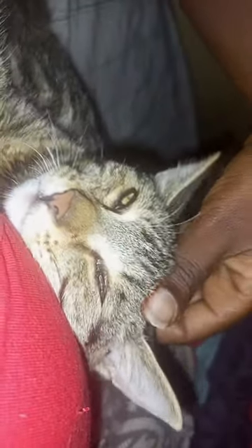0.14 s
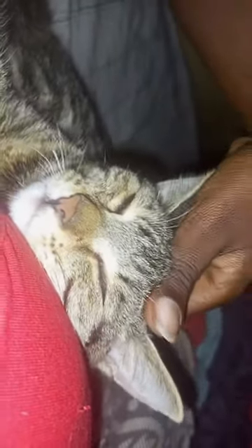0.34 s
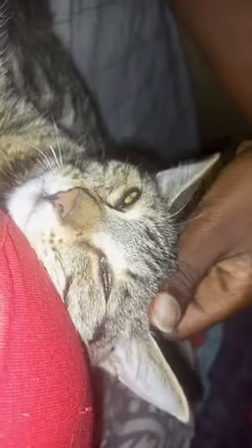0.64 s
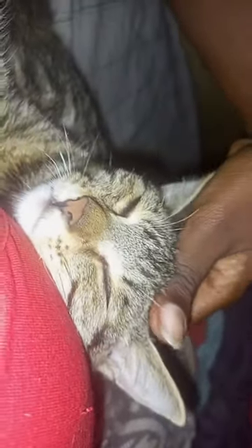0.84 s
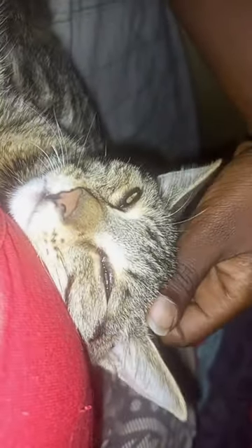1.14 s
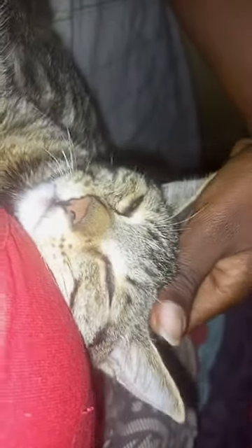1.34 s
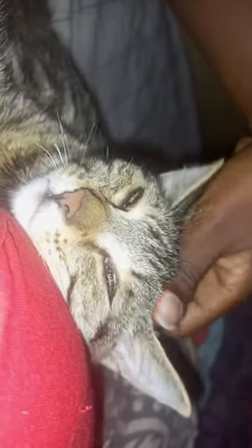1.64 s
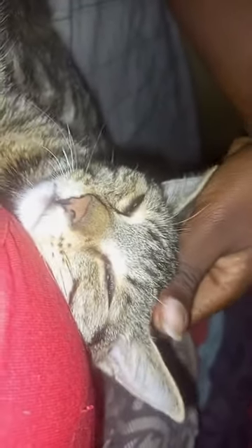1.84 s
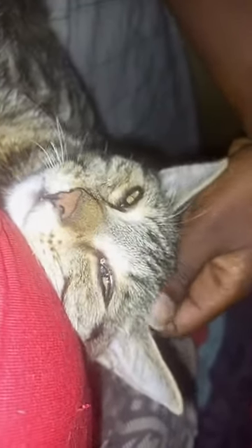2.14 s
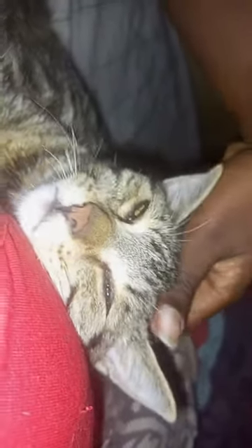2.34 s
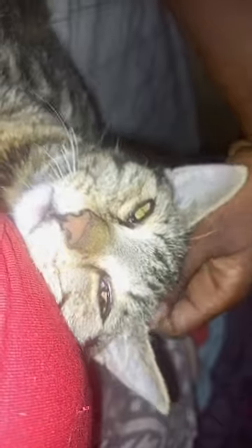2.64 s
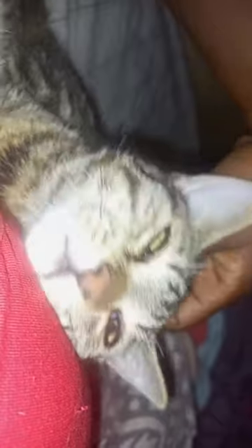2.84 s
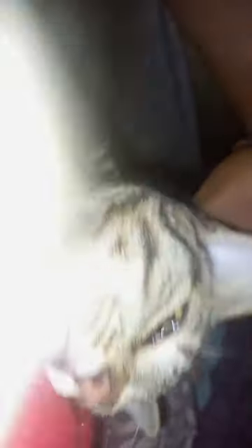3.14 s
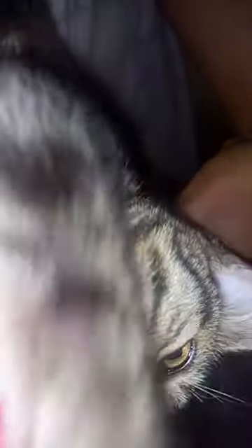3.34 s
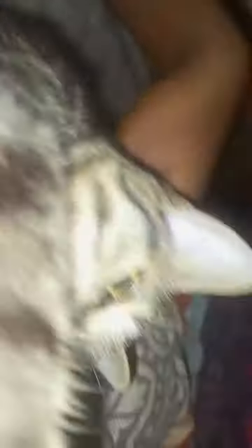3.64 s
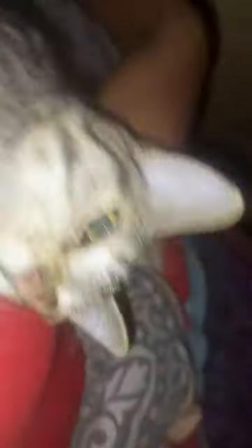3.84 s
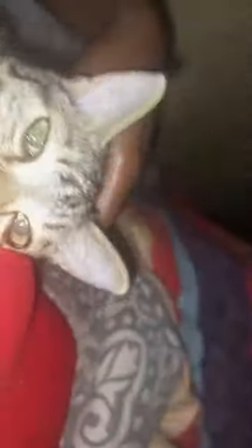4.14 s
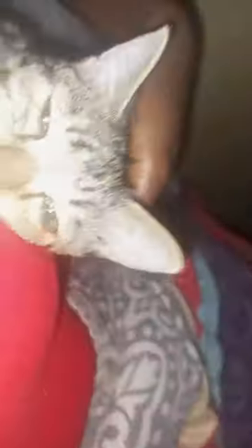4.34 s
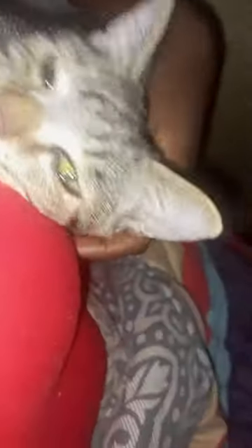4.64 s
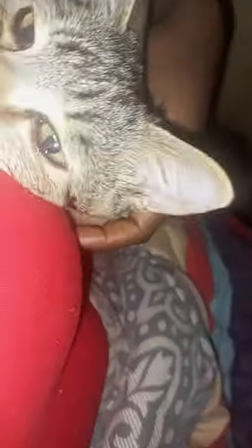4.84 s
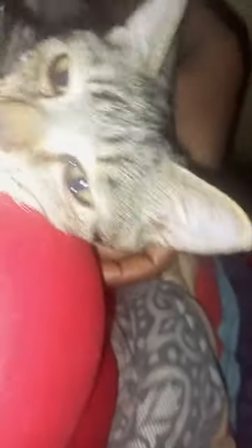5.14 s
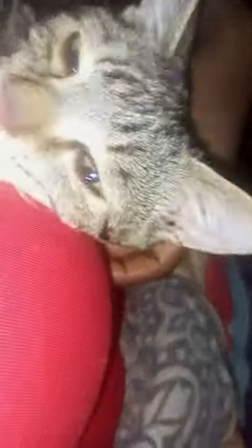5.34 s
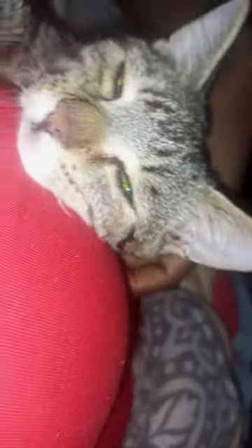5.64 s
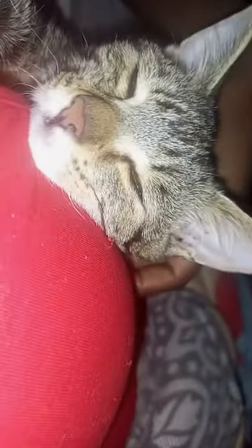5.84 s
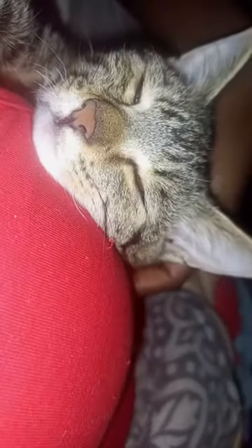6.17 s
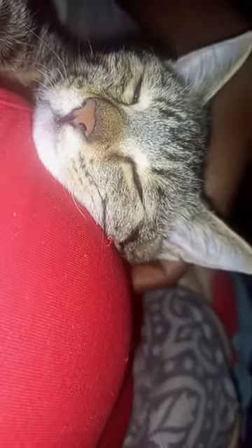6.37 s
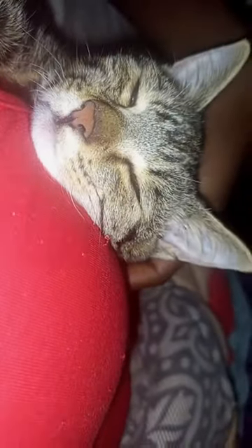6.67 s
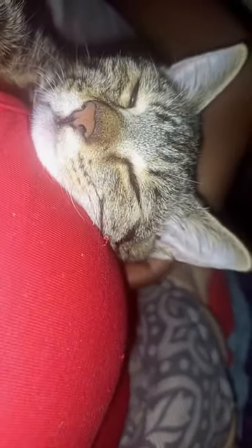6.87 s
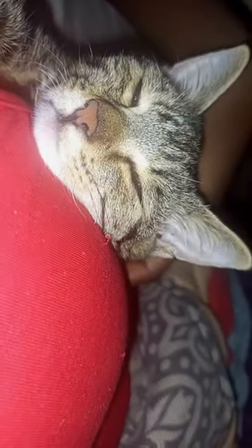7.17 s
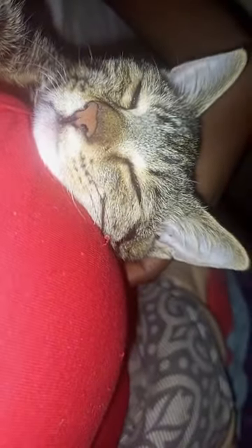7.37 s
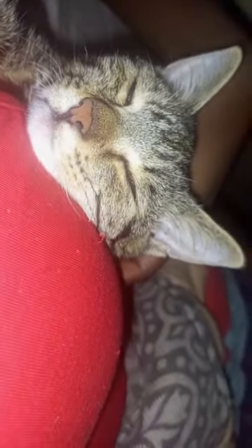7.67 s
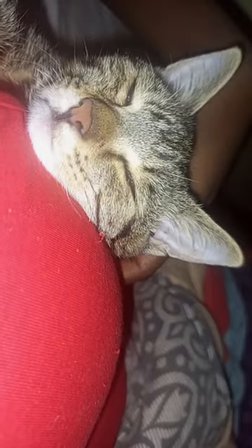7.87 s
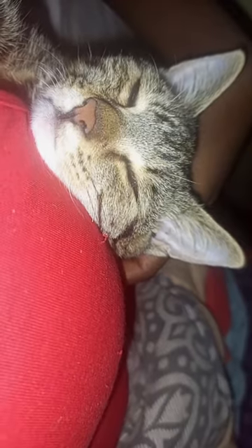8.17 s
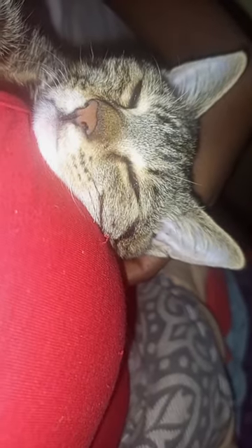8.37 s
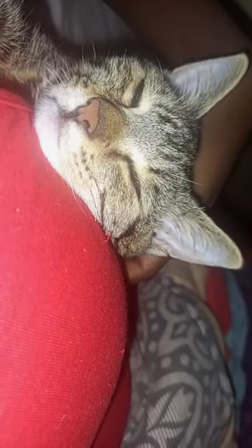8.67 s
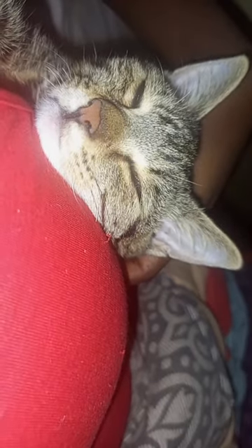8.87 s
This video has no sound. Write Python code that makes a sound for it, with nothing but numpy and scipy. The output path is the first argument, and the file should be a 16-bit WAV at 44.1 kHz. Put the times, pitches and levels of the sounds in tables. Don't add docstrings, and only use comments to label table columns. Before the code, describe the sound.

Very close, dry sound of a dozing kitten in a quiet soft-furnished room. The purr never stops, alternating between slightly firmer, quicker in-breaths and softer out-breaths, each around half a second or shorter. After a brief sniff, the purr carries on until fingers shift on the microphone's hard case, giving a bright crackling clatter much louder than the purr. It settles into occasional small clicks, while purring, low bedding groans and soft hiss continue.

```python
import sys
import numpy as np
from scipy import signal
from scipy.fft import rfft, irfft, next_fast_len
from scipy.io import wavfile
from scipy.ndimage import uniform_filter1d, map_coordinates

SR = 44100
rng = np.random.default_rng(int(sys.argv[2]) if len(sys.argv) > 2 else 0)


def transcribe(signal):
    frames = np.atleast_2d(signal).T
    limited = np.clip(frames, -1, 1)
    pcm = np.round(limited * 32767).astype(np.int16)
    wavfile.write(sys.argv[1], SR, pcm)


def magnitude_from_level(level_db):
    exponent = np.asarray(level_db, float) / 20
    return 10 ** exponent


N = 397341


def unit(x):
    return x / np.sqrt(np.mean(x ** 2) + 1e-20)


def curves(rows, t):
    s, *cols = np.transpose(rows)
    return [np.interp(t, s, c) for c in cols]


def filtered(x, response):
    m = next_fast_len(N + SR // 2)
    return irfft(rfft(x, m) * response(np.fft.rfftfreq(m, 1 / SR)), m)[:N]


def colour(points):
    hz, db = np.transpose(points)
    return lambda f: magnitude_from_level(np.interp(np.log(f + 1), np.log(hz + 1), db, left=-120, right=-120))


def peak(f, hz, width_hz):
    return 1j * f * width_hz / (hz * hz - f * f + 1j * f * width_hz)


def lowpass(f, edge_hz, order):
    return 1 / (1 + (f / edge_hz) ** order)


def noise(response):
    return unit(filtered(rng.standard_normal(N), response))


def wobble(rate):
    return map_coordinates(rng.standard_normal(int(N * rate / SR) + 4), [np.arange(N) * rate / SR])


def swell(t, centre, half):
    return np.exp(-((t - centre) / half) ** 2)


def train(times, sizes):
    at = np.clip(np.round(times * SR).astype(int), 0, N - 1)
    return np.bincount(at, sizes, N)


def patchy(x, depth_db):
    z = signal.stft(x, nperseg=512)[2]
    field = uniform_filter1d(rng.standard_normal(z.shape), size=9, axis=0)
    field = uniform_filter1d(field, size=16, axis=1)
    return signal.istft(z * magnitude_from_level(depth_db * unit(field)), nperseg=512)[1][:N]


def facing(t):
    return swell(t, 3.9, .8)


# (frequency [Hz], level [dB])
HISS_COLOUR = [(590, -45), (1000, -4), (1190, -11), (1510, -12), (5810, -16), (7970, -23), (13200, -25),
               (14800, -18), (15500, -20.5), (15700, -80)]
HISS_DB, RUSTLE_DB, STIR_DB = -71.5, 1.2, .8


def room():
    t = np.arange(N) / SR
    murk = noise(lambda f: peak(f, 200, 260) * (1 + 0.5 * peak(f, 850, 370)) * lowpass(f, 1000, 6))
    murk = magnitude_from_level(-70 + 2 * wobble(6)) * murk
    hiss_db = HISS_DB + .4 * wobble(3) + STIR_DB * facing(t)
    return murk + magnitude_from_level(hiss_db) * patchy(noise(colour(HISS_COLOUR)), RUSTLE_DB)


def bedding(x):
    t = np.arange(SR // 20) / SR
    pieces = np.pad(x, (0, -N % 8192)).reshape(-1, 8192)
    tails = rng.standard_normal((len(pieces), len(t))) * magnitude_from_level(-60 * t / .045) * np.clip(t / .005, 0, 1)
    wet = signal.fftconvolve(pieces, tails / np.linalg.norm(tails[0]), axes=1)
    spill = np.pad(wet[:-1, 8192:], ((1, 0), (0, 8193 - len(t))))
    return (wet[:, :8192] + spill).ravel()[:N]


# (time [s], peak
# level [dB], ring [Hz])
CRACKS = [(4.7559, -29, 4930), (4.763, -37.5, 5900), (4.794, -24, 5100), (4.8076, -32.5, 6090),
          (4.8163, -30.5, 4350), (4.8224, -17.5, 7450), (4.828, -18.5, 5300), (4.843, -31, 6030),
          (4.848, -30, 6130), (4.855, -29.5, 6200), (4.863, -20, 4330), (4.8676, -21.5, 6170),
          (4.8783, -26.5, 9860), (4.883, -24, 5470), (4.8892, 0.5, 3780), (4.9032, -24.5, 5493),
          (4.921, -16, 6934), (4.927, -29.5, 4030), (4.9392, -11.5, 2280), (4.947, -20.5, 4140),
          (4.959, -31, 6100), (4.963, -27.5, 6760), (4.973, -23.5, 4050), (4.979, -26, 4720),
          (4.9994, -27.5, 5880), (5.0047, -23, 4600), (5.059, -16, 5667), (5.0615, -37.5, 9700),
          (3.349, -43.5, 1494), (4.8606, -19, 5310), (4.909, -46, 7924), (5.045, -38, 9500),
               (4.785, -49, 9000), (4.832, -32, 8000), (4.8365, -34, 8980), (4.8445, -35, 8950),
               (4.925, -30, 8500), (4.968, -37, 3000), (4.989, -36, 10000), (5.049, -38, 6000),
               (5.04, -40, 2500), (4.8578, -22.5, 8020), (5.245, -52.5, 11520), (5.281, -51, 4100),
               (5.2545, -55, 9000), (5.318, -50, 9500), (5.333, -52.5, 6010), (5.396, -52, 3990),
               (5.4655, -51.5, 7960), (5.188, -53, 3200), (6.2346, -48, 4500), (6.587, -56, 9000),
               (6.598, -55.5, 6000), (6.621, -56, 6200), (8.333, -57, 6000), (8.339, -56, 5000),
               (7.6535, -41.5, 7500), (7.655, -44, 12000), (1.104, -57, 9300), (5.2123, -48, 13000),
               (5.293, -53, 10000), (6.568, -56, 4500), (6.631, -55, 5514), (7.576, -47.5, 4504),
               (7.594, -46, 4040), (7.646, -50.5, 6000), (7.6592, -50.5, 1990), (7.795, -57, 7490)]
# (time [s], peak level [dB], ring [Hz])
KNOCKS = [(4.8643, -28, 1141), (4.9164, -29, 1165), (4.9277, -26.5, 1192), (4.98, -32, 1304),
          (5.005, -32, 910.3), (4.899, -42, 900), (4.998, -40, 880), (4.6, -49, 510), (4.907, -44.5, 303.7),
          (4.864, -42, 480), (4.794, -46, 200), (4.949, -40, 230), (4.997, -36, 1600), (4.899, -40, 1400),
          (4.448, -45.5, 187), (5.4, -52, 110), (5.009, -42.5, 350), (5.024, -44, 350)]
# (time [s], peak level [dB], ring [Hz], ring length [swings])
SETTLING = [(0.8305, -47, 5000, 1.6), (0.94, -53, 3400, 2.8), (.94, -56, 8000, 3), (3.3485, -49.5, 6560, 3),
            (5.0719, -43, 10600, 1.1), (5.083, -48, 5050, 1.25), (5.1154, -38.5, 10200, 2.6),
            (5.1363, -38.5, 7120, 3.7), (5.1477, -40.5, 3850, 3.9), (5.1668, -27.5, 4250, 1.44),
            (5.1736, -36, 4422, 0.74), (5.2123, -44.5, 9500, 4.4), (5.2329, -40.5, 4230, 1.6),
            (5.2631, -47, 5055, 2.4), (5.293, -41.5, 4030, 1), (5.2993, -39.5, 6350, 0.69),
            (5.3522, -44.5, 3870, 1.24), (5.3654, -40, 7300, 3.7), (6.1543, -41, 7000, 9.8),
            (6.234, -42, 9765, 2.4), (6.5805, -47.5, 9800, 3.5), (6.579, -53, 2300, 1.2),
            (6.5929, -41, 3806, 1.3), (7.1382, -23, 6620, 1.96), (7.1385, -42.5, 1900, 1.5),
            (4.889, -47, 110, 0.88), (6.1545, -48.5, 5150, 6), (6.1545, -57, 4300, 6),
            (6.155, -60, 2600, 3.8), (7.661, -55, 2050, 7), (5.083, -52, 8000, 2), (5.1405, -48, 7000, 2),
            (5.0625, -40, 13000, 3), (6.163, -54, 7000, 9), (6.163, -59, 5200, 7), (6.249, -60, 3100, 5),
            (6.537, -60, 7250, 13.4), (8.3515, -53, 5800, 4), (8.308, -54, 4300, 2.5),
            (8.737, -56, 4200, 3), (7.66, -51.5, 2100, 2.6), (8.737, -55, 3480, 2.1),
            (7.142, -33, 5970, 0.53), (7.2954, -47, 6500, 0.98), (7.6007, -47, 3940, 2.5),
            (7.6504, -34.5, 4370, 0.44), (7.6579, -28, 9030, 1.7), (8.3512, -45, 7500, 1.5),
            (8.7365, -41.5, 4370, 0.94)]


def contacts():
    u = np.arange(-400, 400) / SR
    ticks, edges = np.zeros(N + SR), np.zeros(N + SR)
    hits = [(s, db, hz, 0.44 + hz * 0.00014) for s, db, hz in CRACKS]
    hits += [(*knock, 2.0) for knock in KNOCKS] + SETTLING
    for (s, db, hz, swings), grit in zip(hits, rng.standard_normal((len(hits), len(u)))):
        ring = -1.2 * np.exp(-(u * hz / (.5 * swings)) ** 2) * np.sin(2 * np.pi * hz * u)
        blur = uniform_filter1d(grit[::-1], size=12) * np.cos(2 * np.pi * hz * u)
        halo = 0.21 * np.exp(-np.abs(u) / 0.0021) * blur
        edge = .3 * np.exp(-np.abs(u) / .0001) * grit
        rattle = 0.04 * np.exp(-np.abs(u) / 0.0012) * grit[::-1]
        sharpness = np.clip((db + 52) / 28, .25, 1) * (hz > 1500) * (.5 if s > GRIP[-1][0] else 1)
        first = round(s * SR) - 400
        ticks[first:][:len(u)] += magnitude_from_level(db) * (ring + halo)
        edges[first:][:len(u)] += magnitude_from_level(db) * sharpness * (edge + rattle)
    return ticks[:N], edges[:N]


# (time [s], creak level [dB], low scrape level [dB])
GRIP = [(4.72, -76, -59), (4.76, -65, -62), (4.8, -60, -60), (4.82, -50, -55), (4.84, -50, -58),
        (4.865, -46, -49), (4.895, -52, -47), (4.93, -52.5, -40), (4.955, -54, -42), (4.975, -51, -50),
        (4.99, -56, -49), (5.01, -51, -51), (5.03, -58, -56), (5.055, -58, -70), (5.07, -63.5, -77),
        (5.1, -68.5, -77.5), (5.42, -81, -87)]
# (frequency [Hz], level [dB])
CASE_COLOUR = [(590, -30), (1000, -12), (1240, -9), (2190, -10.5), (4130, -9.5), (4540, -8), (7010, -11),
               (13400, -24), (15200, -25), (16500, -32.5)]
# (centre time [s], half length [s], level [dB])
BRUSHES = [
    (5.164, 0.012, -67),
    (6.588, 0.029, -65),
    (7.595, 0.034, -81),
    (7.657, 0.0049, -62),
]


def grip():
    t = np.arange(N) / SR
    case = colour(CASE_COLOUR)
    creak_db, low_db = curves(GRIP, t)
    held = (t > GRIP[0][0]) & (t < GRIP[-1][0])
    slips = rng.random(N) < 900 / SR
    snaps = slips * rng.standard_normal(N) * magnitude_from_level(7 * np.minimum(rng.exponential(size=N), .8))
    spray = unit(snaps) + .8 * rng.standard_normal(N)
    spray = unit(filtered(spray, lambda f: case(f) * lowpass(f, 11000, 2)))
    scrape = magnitude_from_level(2.7 * wobble(70)) * patchy(noise(lambda f: peak(f, 330, 420) ** 2), 3)
    ticks, edges = contacts()
    shell = filtered(edges, lambda f: case(f) * (1 + 1.3 * swell(f, 11500, 3500)))
    close = held * (magnitude_from_level(creak_db + 3 * wobble(60)) * spray + magnitude_from_level(low_db - 4) * scrape)
    close += ticks + magnitude_from_level(10) * shell
    lone = ticks * (np.abs(t - 4.9) > .17)
    close += magnitude_from_level(-22) * filtered(bedding(lone), lambda f: lowpass(f, 8000, 4))
    close += spray * sum(magnitude_from_level(db) * swell(t, s, half) for s, half, db in BRUSHES)
    return filtered(close, lambda f: 1 + 5 * peak(f, 15300, 1200))


# (start time [s], parting snap level [dB], shutting snap against it [dB], body rumble level [dB],
# effort peak [share of the breath])
BREATHS_IN = [(0.1342, -38, -2.5, -61, 0.26), (0.693, -39, -4, -56.5, 0.38),
              (1.256, -40, -1.5, -56.5, 0.71), (1.8975, -40, -4, -56.5, 0.51),
              (2.5015, -41, -7, -56.5, 0.54), (3.5283, -38.5, -4, -52.5, 0.48),
              (4.0903, -40.5, -2, -61, 0.65), (4.5771, -41, -5.5, -59, 0.21),
              (5.169, -44, -5.5, -62.5, -0.27), (5.6212, -43.5, -1.5, -58.5, 0.39),
              (6.1502, -44.5, 0, -57, 0.12), (6.568, -42.5, -4.5, -58, 0.45),
              (7.0954, -40.5, -7.5, -61, 0.55), (7.7415, -43, -1.5, -60, .4),
              (8.3456, -41, -0.5, -59.5, 0.41)]
# (start time [s], parting snap level [dB], shutting snap against it [dB],
# body rumble level [dB], effort peak [share of the breath])
BREATHS_OUT = [(-0.174, -42, -6, -61, 0.32), (0.383, -42.5, -3, -58, 0.19),
               (0.9448, -42, -2.5, -55.5, 0.25), (1.5467, -43.5, -0.5, -60.5, 0.56),
               (2.1885, -44, -1, -61.5, -0.0062), (3.0532, -41.5, -2.5, -65.5, 0.098),
               (3.817, -44.5, -1.5, -59.5, 0.53), (4.3042, -43.5, -0.5, -57.5, 0.24),
               (4.829, -49.5, -6, -70, 0.29), (5.134, -44, -7, -69, -0.14), (5.3484, -46.5, -5, -62, 0.26),
               (5.8378, -45, -3.5, -59, 0.22), (6.329, -44.5, -3, -61, .4),
               (6.8202, -44.5, -5.5, -60, 0.25), (7.3892, -44, -7, -61.5, 0.12),
               (7.9935, -43, -7, -63, 0.17), (8.601, -44.5, -4.5, -63, 0.12)]
# (centre time [s], half length [s], lag [ms])
STUMBLES = [(.172, .03, -2), (.61, .06, -2), (.745, .04, -2.7), (1.04, .06, 1.2), (1.16, .05, -1),
            (1.73, .12, -2.2), (1.97, .05, -1.6), (2.25, .04, 2.2), (2.42, .06, -2.2), (2.72, .1, 1),
            (2.98, .07, -2.2), (3.19, .1, 2.6), (3.44, .05, -1), (4.4, .04, -1), (5.22, .04, -1.8),
            (5.41, .055, 2.2), (5.68, .04, -1), (5.99, .09, 1), (6.22, .05, -2), (6.38, .05, 1.8),
            (6.73, .05, 1), (6.99, .07, -2.2), (7.16, .05, -1.8), (7.53, .07, 1.6), (7.82, .04, -1),
            (8.4, .04, -2.2), (8.7, .07, 2.2)]
END_S = 8.9903
PACE_IN = dict(cycle=.0362, drag=.0015, bow=.0008, rise_db=10, fall_db=8, tilt_db=-2.5)
PACE_OUT = dict(cycle=.039, drag=-.0018, bow=.0004, rise_db=5, fall_db=6.5, tilt_db=-1)


def cycles():
    breaths = sorted([(*b, False) for b in BREATHS_IN] + [(*b, True) for b in BREATHS_OUT])
    ends = [b[0] for b in breaths[1:]] + [END_S]
    rows = []
    for (start, part_db, shut_db, rumble_db, top, out), end in zip(breaths, ends):
        pace = PACE_OUT if out else PACE_IN
        count = round((end - start) / pace["cycle"])
        u = np.arange(count) / count
        rising = pace["rise_db"] * (1 - u / top) ** 2
        falling = pace["fall_db"] * ((u - top) / (1 - top)) ** 2
        slack_db = np.where(u < top, rising, falling)
        s = start + u * (end - start) + pace["bow"] * np.sin(np.pi * u)
        s = s + pace["drag"] * np.sin(2 * np.pi * u ** .7)
        last_db = 2.5 * (u == u[-1])
        rows.append([s, out & (u > 0), part_db - slack_db - last_db,
                     shut_db + pace["tilt_db"] * (2 * u - 1), rumble_db - 0.4 * slack_db])
    s, *air = np.hstack(rows)
    s = s + sum(lag / 1000 * swell(s, at, half) for at, half, lag in STUMBLES)
    return np.vstack([s, np.roll(air, 1, axis=1)])


def turning(t):
    parts = cycles()[0]
    return 2 * np.pi * np.interp(t, np.append(parts, END_S), np.arange(len(parts) + 1))


# (centre time [s], half length [s], level [dB], pitch [Hz])
WHISTLES = [(0.246, 0.093, -85, 1670), (0.475, .04, -75, 1870), (0.714, 0.04, -72, 1310),
            (0.82, .05, -72, 1606), (1.033, 0.02, -73, 1720), (1.275, 0.018, -66, 2480),
            (1.446, 0.1, -72.5, 1690), (1.71, 0.037, -73.5, 1680), (2.058, 0.066, -75, 1686),
            (2.867, 0.012, -67.5, 1790), (3.029, 0.072, -71.5, 1286), (3.08, 0.019, -69, 2167),
            (3.236, 0.12, -68.5, 2390), (3.22, 0.085, -70, 1850), (3.73, 0.047, -72, 1390),
            (3.75, 0.09, -78, 5600), (3.945, 0.02, -75, 1900), (4.234, 0.05, -77, 5300),
            (4.286, 0.045, -79, 2200), (4.467, 0.08, -79, 1796), (3.153, 0.02, -78, 3880),
            (3.2, .01, -79, 3950), (3.237, .012, -78, 3750), (5.45, .1, -77, 1500), (5.72, .12, -77, 1400),
            (4.67, .06, -75, 1300), (3.5, .1, -77, 1250), (6.7, .08, -77, 1300), (4.1, .1, -78, 2600),
            (3.135, .008, -70, 2210), (3.16, .01, -68, 2000), (3.2, .07, -73, 1417),
            (2.414, .012, -68, 1900), (8.204, 0.16, -77.5, 1238)]


def whistles():
    t = np.arange(N) / SR
    turn = turning(t)
    puffs = 0.22 + 0.7 * np.exp(6 * (np.cos(turn) - 1)) + 0.6 * np.exp(4 * (np.cos(turn + 2.1) - 1))
    flutter = np.tanh(1.5 * noise(lambda f: lowpass(f, 170, 2)))
    air = np.zeros(N)
    for (s, half, db, hz), shift in zip(WHISTLES, rng.integers(N, size=len(WHISTLES))):
        near = slice(round((s - 2 * half) * SR), round((s + 2 * half) * SR))
        tone = np.sin(2 * np.pi * hz * t[near]) * np.roll(flutter, shift)[near]
        air[near] += magnitude_from_level(db) * swell(t[near], s, half) * tone
    return magnitude_from_level(11.0 + wobble(25)) * puffs * air


# (start time [s], length [s], level [dB])
SNIFF = (2.3865, 0.028, -38.5)
# (frequency [Hz], level [dB])
SNIFF_COLOUR = [(120, -38), (200, -12), (620, -6), (900, -22), (1070, -9), (1500, -6), (1800, -2),
                (2320, 1), (2750, -20), (3150, -34), (3750, -40), (4400, -21), (4850, -26), (5200, -42),
                (9000, -46), (11700, -79), (19800, -120)]


def sniff():
    t = np.arange(N) / SR
    start, length, db = SNIFF
    gate = np.clip(np.minimum(t - start, start + length - t) / 0.0027, 0, 1)
    gate = gate * (0.64 + 0.56 * swell(t, start + 0.41 * length, 0.0073))
    return magnitude_from_level(2.4 * wobble(160) + db) * gate * noise(colour(SNIFF_COLOUR))


# (centre time [s], half length [s], level [dB])
HUMS = [(0.0, 0.026, -58.5), (0.33, 0.13, -56), (0.553, 0.071, -62), (0.833, 0.074, -56.5),
        (1.09, 0.056, -56.5), (1.257, 0.074, -60), (1.47, 0.1, -63), (1.76, 0.066, -61),
        (2.095, 0.078, -55.5), (2.34, 0.077, -60), (2.725, 0.088, -62), (2.888, 0.046, -56.5),
        (3.213, 0.13, -82), (3.762, 0.043, -59), (4.68, 0.22, -67), (5.419, 0.08, -64.5),
        (6.18, 0.061, -55.5), (6.47, 0.04, -64), (6.56, 0.027, -62.5), (7, 0.1, -61), (7.174, 0.067, -58.5),
        (7.395, 0.047, -52.5), (7.593, 0.05, -52), (7.9, 0.097, -63.5), (8.217, 0.048, -60.5),
        (8.595, 0.12, -59.5)]
# (centre time [s], half length [s], level [dB], pitch [Hz])
GROANS = [
    (3, 0.038, -59, 130),
    (6.35, 0.047, -49, 158),
    (6.43, 0.04, -50.5, 175),
    (5.2, 0.036, -63, 190),
    (6.9, 0.057, -58, 210),
    (6.485, .02, -55.5, 145),
    (3.2, 0.085, -62.5, 300),
    (3.48, 0.065, -59, 140),
    (7.76, 0.037, -56, 100),
]
HUM_REST_DB = -77


def chest():
    t = np.arange(N) / SR
    phase = turning(t)
    pressed = magnitude_from_level(HUM_REST_DB) + sum(magnitude_from_level(db) * swell(t, s, half) for s, half, db in HUMS)
    centre_hz = 226 - 4 * (20 * np.log10(pressed) - HUM_REST_DB)
    rumble_db = np.interp(t, *cycles()[[0, -1]])

    def overtone(order):
        return np.sqrt(2) * np.sin(order * phase + 1.5 * wobble(12))

    def favour(order):
        return np.exp(-((order * 26.5 - centre_hz) / 60) ** 2)

    hum = overtone(order=3) + .35 * overtone(order=4)
    hum += .8 * noise(lambda f: peak(f, 80, 25) ** 2 + .25 * peak(f, 55, 40))
    rumble = sum(favour(order=k) * magnitude_from_level(2 * wobble(8)) * overtone(order=k) for k in range(4, 13))
    rumble += 1.2 * noise(lambda f: peak(f, 210, 220) ** 2)
    beat = 1 + .45 * np.cos(phase + 1.2)
    groan = np.zeros(N)
    groan_db = 3.0 * wobble(30)
    for s, half, db, hz in GROANS:
        groan += magnitude_from_level(db + groan_db) * swell(t, s, half) * np.sin(2 * np.pi * hz * t + 0.87 * wobble(25))
    return groan + magnitude_from_level(2.0) * pressed * hum + magnitude_from_level(rumble_db - 9.5 + 1.3 * wobble(11)) * beat * rumble


def muffle(f, edge_hz):
    b, a = signal.cheby1(7, .5, edge_hz, analog=True)
    response = signal.freqs(b, a, f)[1]
    return np.abs(response) * np.exp(.35j * np.unwrap(np.angle(response)))


def travel(f, late_s):
    return np.exp(-2j * np.pi * f * late_s)


# (frequency [Hz], width [Hz], level [dB])
NOSTRILS = [(1080, 87, 3), (1550, 730, 1), (2300, 500, 1)]


def larynx():
    rows = cycles()
    parts, out, part_db, shut_db, _ = rows[:, rows[0] > 0]
    period = np.gradient(parts)
    sign = np.where(out, 1., -1.)
    luck = rng.standard_normal((len(parts), 6))
    shuts = parts - (.0118 + .62 * (period - .0375)) + .0003 * luck[:, 0]
    part = sign * magnitude_from_level(part_db + np.where(out, 0.1, -0.1) + 1.3 * luck[:, 1])
    shut = sign * magnitude_from_level(part_db + shut_db + 1.5 * luck[:, 2])

    lead = np.where(out, .9, .55) + .15 * luck[:, 3]
    crisp = train(parts, part) - train(parts - .0008 - .0001 * luck[:, 2], lead * part)
    sharp = np.where(out, .55, .95) * shut
    crisp += .8 * train(shuts, sharp)
    crisp -= train(shuts - .0008, (.3 + .15 * luck[:, 4]) * sharp)

    shut = np.where(out, 1.9, 1.05) * shut * magnitude_from_level(luck[:, 3])
    thud_lead = np.where(out, .45, .8) + .2 * luck[:, 5]
    thud = train(shuts, shut) - train(shuts - np.where(out, .0022, .003), thud_lead * shut)
    blunt = train(parts + .0004, np.where(out, .9, .2) * part * magnitude_from_level(luck[:, 0]))
    bright = train(parts, part * magnitude_from_level(3 * luck[:, 5])) + train(shuts, .35 * shut * magnitude_from_level(3 * luck[:, 4]))
    bright = magnitude_from_level(4 * facing(np.arange(N) / SR)) * bright

    def nose(f):
        return muffle(f, 965) * (1 + 0.3 * peak(f, 780, 200)) * lowpass(f, 940, 6) * travel(f, -.0001)

    def throat(f):
        return peak(f, 230, 180) * muffle(f, 620) * travel(f, -.0001)

    def flesh(f):
        return np.abs(peak(f, 150, 450)) * lowpass(f, 480, 4) * travel(f, .0004)

    def leak(f):
        return magnitude_from_level(-26) * sum(magnitude_from_level(db) * peak(f, hz, width) ** 2 for hz, width, db in NOSTRILS)

    snaps = filtered(crisp, nose) + filtered(blunt, throat)
    return magnitude_from_level(31.0) * (snaps + filtered(thud, flesh) + filtered(bright, leak))


def scene():
    purr = larynx()
    body = purr + magnitude_from_level(-12.5) * bedding(purr) + chest()
    return (body + whistles() + sniff() + grip() + room())[None]


def top_cut(x):
    return signal.sosfilt(signal.butter(12, 16820, fs=SR, output="sos"), x)


def record(dry):
    def microphone(f):
        return (1j * f / (1j * f + 44)) ** 2 * (f < 16650) * np.where(f < 15800, 1, .3)

    heard = filtered(np.clip(dry[0], -.99, .99), microphone)
    return top_cut(np.clip(heard[None] - .0003, -1, 1))


dry = scene()
out = record(dry)
transcribe(out)
```